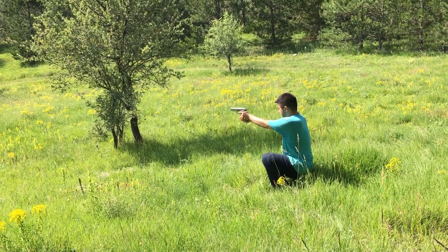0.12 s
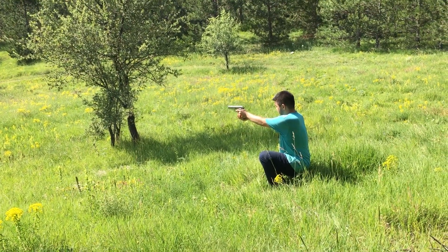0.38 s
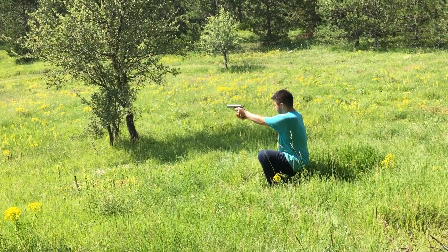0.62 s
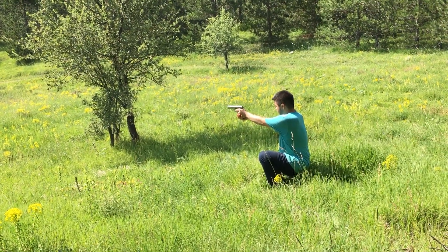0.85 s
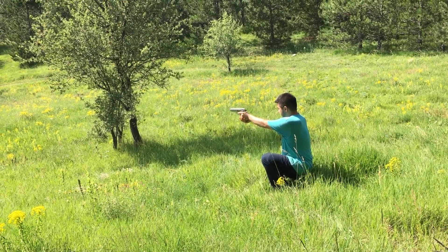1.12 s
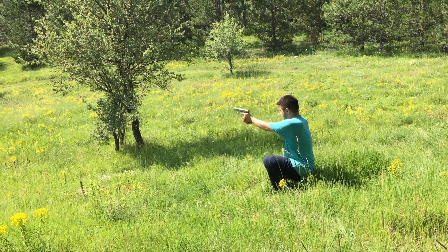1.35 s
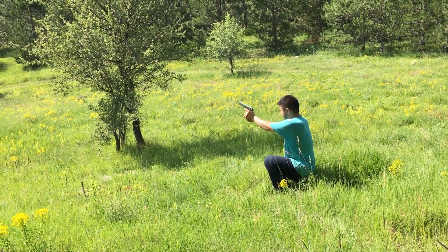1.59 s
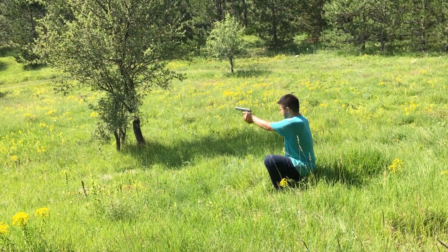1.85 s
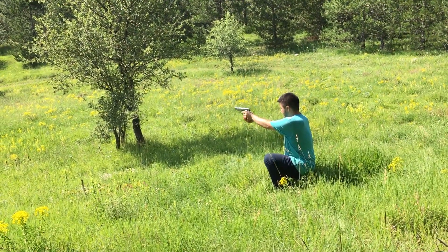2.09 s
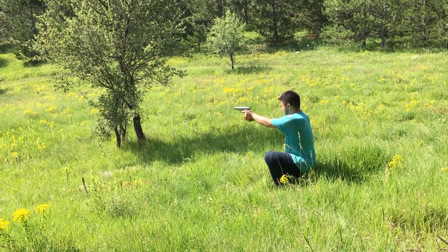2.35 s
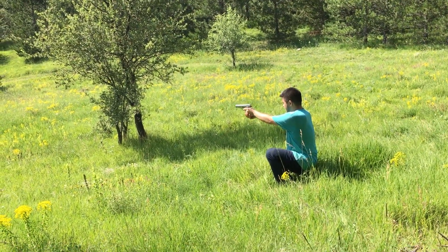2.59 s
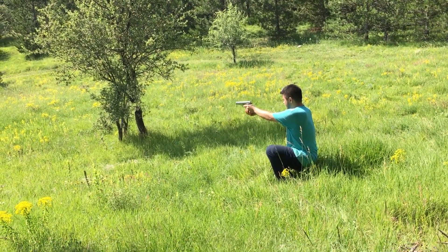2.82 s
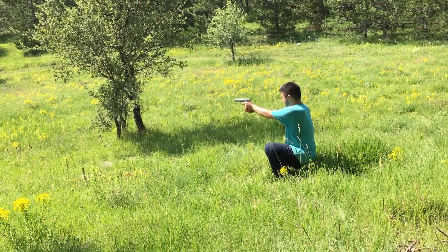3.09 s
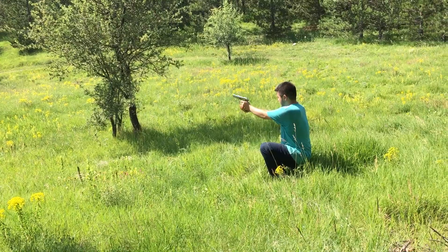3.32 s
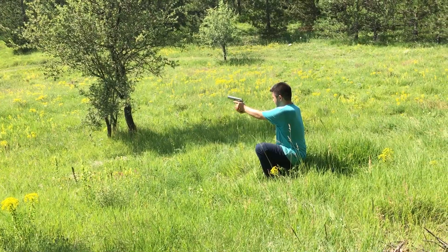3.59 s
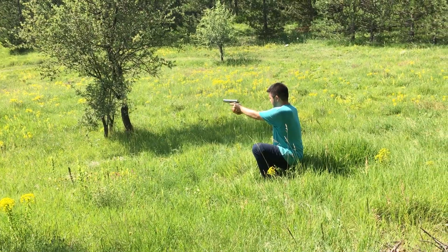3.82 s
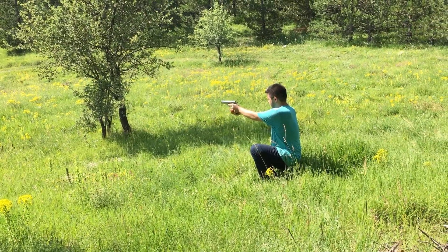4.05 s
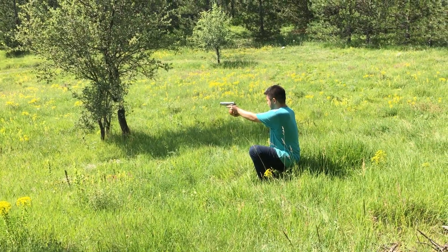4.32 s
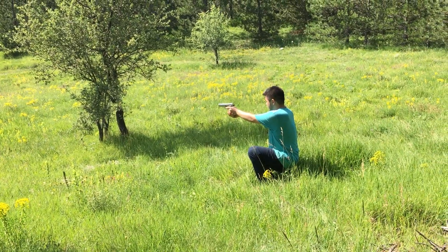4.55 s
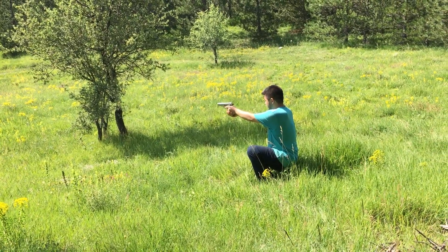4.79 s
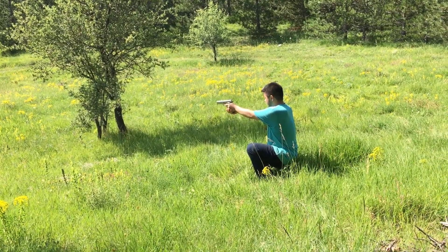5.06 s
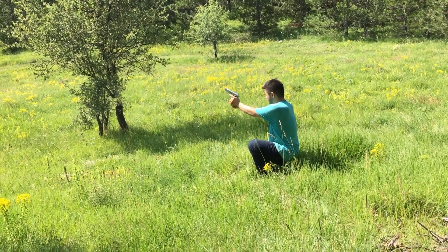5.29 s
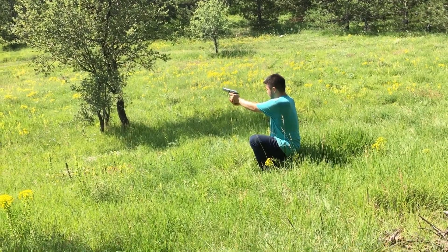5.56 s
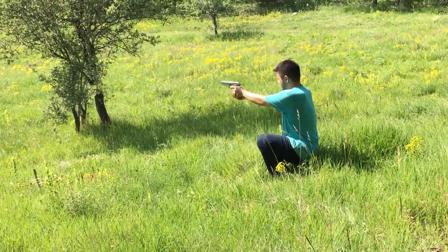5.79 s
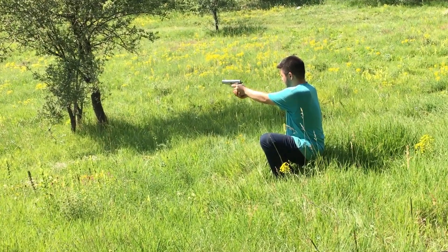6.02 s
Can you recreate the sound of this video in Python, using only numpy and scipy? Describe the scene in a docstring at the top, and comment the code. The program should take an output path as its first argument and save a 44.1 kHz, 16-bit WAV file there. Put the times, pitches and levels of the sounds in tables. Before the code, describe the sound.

Outdoors, faint ticking and soft breeze are broken by three evenly spaced pistol cracks, each rolling back from the trees as it darkens.

```python
"""Blank pistol shots in a meadow

A blank pistol is fired about every two seconds in a meadow ringed by woods, some metres from a small camera.
Each shot is a ringing pressure dip (the crack), a low thump and a roar of shaped noise off grass and near trees.
The woods answer with the same long, dulling echo each time, built from scattered pulses and fading noise.
The camera ticks faintly, a breeze of filtered noise rumbles, and a limiter ducks these sounds after every shot.
Steady hiss and a low rumble lie behind it all."""
import sys
import numpy as np
from scipy import signal
from scipy.fft import rfft, irfft
from scipy.io import wavfile
from scipy.ndimage import uniform_filter1d, minimum_filter1d

SR = 44100
rng = np.random.default_rng(int(sys.argv[2]) if len(sys.argv) > 2 else 0)


def generate_wav(signal):
    """Clip the signal to [-1, 1] and save it as 16-bit WAV at the path in sys.argv[1]."""
    frames = np.transpose(np.atleast_2d(signal))
    scaled = np.clip(frames, -1, 1) * 32767
    pcm = np.round(scaled).astype(np.int16)
    wavfile.write(sys.argv[1], SR, pcm)


def convert_level_to_amplitude(level_db):
    """Map a level in decibels to its linear amplitude factor."""
    exponent = np.asarray(level_db, float) / 20
    return 10 ** exponent


N = 271656
TIME = np.arange(N) / SR
# centres of the third-octave bands, in Hz
BANDS = 100 * 2 ** np.arange(0, 7.4, 1 / 3)

# All levels in the tables are relative.
# the shots; one before time 0 leaves only its echo: start_s, crack_db, roar_db, echo_db, ring_db
SHOTS = [(-1.055, 16, 0, 1.5, -6), (1.5520, 16, .5, .5, -6), (3.4431, 16, 1, .5, -6.5),
         (5.2469, 16, 3.5, 3, -8)]
# what the crack rings in: pitch_hz, level_db, time_to_fall_60_db_s
CRACK_TONES = [(600, -4, .022), (1150, -3, .010), (3100, -1, .009), (7000, -11, .003)]
# tones that swell up to each crack: pitch_hz, waver_width_hz, level_db, swell_time_s
SWELLING_TONES = [(230, 70, -12, .010), (490, 100, -10, .012), (610, 110, -1, .009), (1200, 120, -15, .009),
                  (3060, 60, -21, .009)]
# fading of the roar off the ground and nearest trees: time_after_shot_s, level_db
ROAR_FADE = [(0, 1), (.006, -2), (.02, -4), (.03, -4), (.036, -10), (.05, -17), (.065, -23), (.095, -31),
             (.14, -48)]
# tone colour of the roar: pitch_hz, level_per_band_db
ROAR_COLOUR = [(100, 1), (200, 0), (500, -6), (900, 1), (1500, 2), (3000, 3.5), (4700, -2), (9000, -3.5),
               (15000, -8)]
# blurred echo, first a near edge and then the deep wood: time_after_shot_s, level_db
WOODS_FADE = [(.095, -31), (.2, -33), (.25, -27), (.3, -30.5), (.36, -36), (.5, -36.5), (.76, -43.5),
              (.92, -42.5), (1.3, -49.5), (1.55, -55), (1.8, -69.5)]
# trunks and edges, near and far, that answer clearly: time_after_shot_s, level_db
CLEAR_TRUNKS = [(.076, -20), (.113, -19), (.119, -22), (.156, -25.5), (.196, -22.5), (.208, -22.5),
                (.221, -21), (.238, -19.5), (.268, -18.5), (.297, -21.5), (.369, -28), (.396, -22.5),
                (.419, -25), (.441, -26.5), (.497, -28), (.522, -27.5), (.545, -30), (.889, -35),
                (.949, -34.5)]
# colour of the echo, with extra loss in air and leaves, and how much of each answer stays sharp:
# pitch_hz, level_per_band_db, loss_db_per_s, sharp_share_0_to_1
ECHO_COLOUR = [(120, -32, 8, 1), (220, -27, 3, 1), (310, -11, 2, 1), (500, -4, -1.5, 1), (800, -4, 2, .9),
               (1300, -4.5, 9, .65), (2200, -7, 11.5, .5), (3500, -11, 18, .25), (6000, -13, 41, 0),
               (9000, -10, 76, 0), (13000, -13, 135, 0)]
# tones of one camera tick: pitch_hz, width_hz, level_db
TICK_TONES = [(6000, 1300, 0), (7800, 1500, -4), (11100, 1200, -5), (14400, 1700, -4)]
# stretch in which the camera ticks three times as fast: start_s, end_s
FAST_TICKS = (5.93, 6.12)
# small dry clicks close by: start_s, level_db, bump_level_db
CLICKS = [(.677, -55, -75), (1.006, -62, -75), (1.306, -58, -75), (2.678, -54, -75), (4.678, -54, -75),
          (5.1422, -43, -45), (5.146, -52, -48), (5.186, -58, -40), (5.1935, -40, -44), (6.0, -50, -70)]
# colour of the breeze: pitch_hz, level_db_per_hz
BREEZE_COLOUR = [(15, -37), (38, -17), (55, -1), (70, -1), (100, -6), (165, -17), (250, -12), (400, -15),
                 (700, -18), (1600, -26), (4000, -34), (6000, -35), (10400, -42), (14800, -40),
                 (16000, -46)]
# spent cases falling into the grass, and a hand shifting on the camera:
# middle_s, level_db, length_s, pitch_hz
RUSTLES = [(2.21, -68, .04, 10000), (4.12, -66, .03, 10000), (5.165, -49, .07, 200),
           (5.146, -62, .012, 4000), (5.188, -44, .015, 260), (5.19, -63, .025, 3500),
           (5.95, -68, .04, 10000)]


def read(table, x, column=1, log=False):
    """Straight lines between the rows of a table; log spaces the first column by pitch."""
    t = np.array(table, float)
    if log:
        return np.interp(np.log(x), np.log(t[:, 0]), t[:, column])
    return np.interp(x, t[:, 0], t[:, column])


def band(x, hz, width):
    """Band-pass; white noise of rms 1 stays at about rms 1."""
    low, high = max(hz - width / 2, 10), min(hz + width / 2, .49 * SR)
    sos = signal.butter(2, [low, high], "band", fs=SR, output="sos")
    return signal.sosfilt(sos, x) * np.sqrt(SR / 2 / (high - low))


def third(x, hz):
    """One of a set of third-octave bands, overlapping triangles; white noise of rms 1 gives about rms 1."""
    freq = np.fft.rfftfreq(len(x), 1 / SR) + 1e-3
    triangle = np.clip(1 - abs(3 * np.log2(freq / hz)), 0, 1)
    return irfft(rfft(x) * triangle, len(x)) * np.sqrt(SR / 2 / (.23 * hz))


def add(out, sound, s):
    """Mix a sound in from time s; whatever falls outside the scene is cut off."""
    i = int(round(s * SR))
    part = sound[max(-i, 0):N - i]
    out[max(i, 0):max(i, 0) + len(part)] += part


def crack(t):
    """Sharp pressure dip: tones whose troughs meet a quarter of a millisecond in, dying within milliseconds."""
    tones = 0
    for hz, db, t60 in CRACK_TONES:
        tones = tones + convert_level_to_amplitude(db) * np.cos(2 * np.pi * hz * (t - .00023)) * convert_level_to_amplitude(-60 * t / t60)
    return -tones


def thump(t):
    """Low push of air: a few swings of a bass tone under a quickly closing envelope."""
    pitch_hz, level_db, length_s = 61, 10, .025
    swing = -np.sin(2 * np.pi * pitch_hz * (t + .0008))
    return convert_level_to_amplitude(level_db) * swing * np.exp(-(t / length_s) ** 3) * np.clip(t / .008, 0, 1)


def roar(t):
    """Gritty noise off grass and near trees, which scatter little bass, so the bass ends early."""
    bass_hz, bass_s = 450, .065
    grit = rng.standard_normal(len(t)) * convert_level_to_amplitude(3.0 * rng.standard_normal(len(t)))
    # it arrives in uneven slaps of 60 samples
    grit *= convert_level_to_amplitude(2.5 * np.repeat(rng.standard_normal(len(t) // 60), 60))
    out = 0
    for hz in BANDS:
        octaves_below = max(np.log2(bass_hz / hz), 0)
        bass_gone = np.exp(-octaves_below * (t / bass_s) ** 1.5)
        out = out + convert_level_to_amplitude(read(ROAR_COLOUR, hz, log=True) - 8) * third(grit, hz) * bass_gone
    return convert_level_to_amplitude(read(ROAR_FADE, t)) * out


def blast(crack_db, roar_db):
    """The direct sound of a shot: crack, thump and roar together."""
    t = np.arange(SR // 5) / SR
    return convert_level_to_amplitude(crack_db) * crack(t) + convert_level_to_amplitude(roar_db) * (roar(t) + thump(t))


def lead_in(ring_db, length_s):
    """A small tick and a fizz, then wavering tones that swell until the crack."""
    t = np.arange(int(length_s * SR)) / SR
    tick = band(rng.standard_normal(len(t)) * np.exp(-t / .0012), 2200, 4000)
    fizz = band(rng.standard_normal(len(t)), 1500, 2500) * (.4 + t / length_s)
    out = convert_level_to_amplitude(-27) * tick + convert_level_to_amplitude(-37) * fizz
    for hz, width, db, swell in SWELLING_TONES:
        # slow noise, summed up, makes the phase wander
        waver = np.cumsum(uniform_filter1d(rng.standard_normal(len(t)), size=130)) * width * 10 / SR
        turns = hz * (t - length_s + .001) + waver - waver[-1]
        out += convert_level_to_amplitude(ring_db + db) * np.exp((t - length_s) / swell) * np.cos(2 * np.pi * turns)
    return out


def stand():
    """Rows (time_s, level_db) of lesser trunks: uneven gaps, levels tied to the blurred echo."""
    gap_s, first_s, last_s = .024, .13, 1.8
    over_echo_db, scatter_db = 5, 2.0
    s = np.arange(first_s, last_s, gap_s)
    chance = rng.standard_normal((len(s), 2))
    s = s + .3 * gap_s * chance[:, 0]
    db = read(WOODS_FADE, s) + over_echo_db + scatter_db * chance[:, 1]
    # leave room around the clear trunks
    nearest_s = abs(s[:, None] - np.array(CLEAR_TRUNKS)[:, 0]).min(axis=1)
    return np.c_[s, db][nearest_s > gap_s / 2]


def woods():
    """The echo of one shot: dense scatter plus clear answers, with the treble fading fastest."""
    late_bass_hz, bass_cut_db, bass_rise_s = 700, -12, .25  # cut per octave below late_bass_hz
    t = np.arange(2 * SR) / SR
    answers = np.zeros(len(t))
    trees = np.r_[CLEAR_TRUNKS, stand()]
    chance = rng.random((len(trees), 16))
    for (s, db), c in zip(trees, chance):
        # a trunk and its neighbours answer within a few ms, pushing or pulling
        places = ((s - .001 + .007 * c[:8]) * SR).astype(int)
        answers[places] += 5.0 * convert_level_to_amplitude(db) * np.sign(c[8:] - .5)
    blurred_power = uniform_filter1d(uniform_filter1d(answers ** 2, size=600), size=600)
    fade_in, fade_out = np.clip((t - .06) / .04, 0, 1), np.clip((2 - t) * 8, 0, 1)
    dense_power = convert_level_to_amplitude(read(WOODS_FADE, t)) ** 2 * fade_in * fade_out
    leaves, out = rng.standard_normal(len(t)), 0
    for hz in BANDS[1:]:
        db, loss_db, sharp = (read(ECHO_COLOUR, hz, column=c, log=True) for c in range(1, 4))
        sharp = np.clip(sharp, 0, 1)
        # leaves smear the treble of each answer
        smear = leaves * np.sqrt(dense_power + (1 - sharp ** 2) * abs(blurred_power))
        # early echoes are thin in bass, which rises later
        late_db = bass_cut_db * max(np.log2(late_bass_hz / hz), 0) * np.exp(-t / bass_rise_s)
        out = out + third((sharp * answers + smear) * convert_level_to_amplitude(db - loss_db * t + late_db), hz)
    return out


def camera():
    """Nearly even ticks of the works inside and clicks of the hand: pulses sent through band-passes."""
    first_s, period_s, tick_db = .0106, .05, -56.5
    pulses, bumps = np.zeros(N), np.zeros(N)
    beat = np.arange(first_s, N / SR - .01, period_s / 3)
    every_third = np.arange(len(beat)) % 3 == 0
    fast = (beat > FAST_TICKS[0]) & (beat < FAST_TICKS[1])
    beat = beat[every_third | fast]
    chance = rng.standard_normal((len(beat), 2))
    places = ((beat + .0003 * chance[:, 0]) * SR).astype(int)
    pulses[places] = convert_level_to_amplitude(tick_db + .8 * chance[:, 1])
    for s, db, bump_db in CLICKS:
        pulses[int(s * SR)] += convert_level_to_amplitude(db)
        bumps[int(s * SR)] += convert_level_to_amplitude(bump_db)
    ticking = sum(convert_level_to_amplitude(db) * band(pulses, hz, width) for hz, width, db in TICK_TONES)
    return 2.1 * ticking + 6.5 * band(bumps, 300, 500)


def rustles():
    """Brief swishes: bands of noise that swell and fade in a bell shape."""
    out = 0
    for s, db, length, hz in RUSTLES:
        bell = np.exp(-((TIME - s) / length) ** 2 * 4)
        out = out + convert_level_to_amplitude(db) * bell * band(rng.standard_normal(N), hz, hz)
    return out


def meadow():
    """Breeze and far hush: coloured noise whose bass comes and goes with random gusts, plus rustles."""
    hz = np.fft.rfftfreq(N, 1 / SR) + 1
    air = irfft(rfft(rng.standard_normal(N)) * convert_level_to_amplitude(read(BREEZE_COLOUR, hz, log=True)), N)
    gust = np.repeat(rng.standard_normal(N // 4000 + 1), 4000)[:N]
    gust = uniform_filter1d(gust, size=4000)
    low = signal.sosfilt(signal.butter(2, 200, fs=SR, output="sos"), air)
    air = air + low * (convert_level_to_amplitude(2.5 * gust) - 1)
    return air * convert_level_to_amplitude(-68) / air.std() + rustles()


def scene():
    """Every shot wakes the same woods, over the meadow and the camera."""
    lead_s = .0232
    out, echo = meadow() + camera(), woods()
    for s, crack_db, roar_db, echo_db, ring_db in SHOTS:
        add(out, convert_level_to_amplitude(echo_db) * echo, s)
        if s > 0:
            add(out, lead_in(ring_db, lead_s), s - lead_s)
            add(out, blast(crack_db, roar_db), s)
    return out[None]


def top_cut(x):
    """Nothing passes above the cut-off."""
    return signal.sosfilt(signal.butter(12, 16490, fs=SR, output="sos"), x)


def record(dry):
    """A limiter drops at once on a peak and recovers slowly; hiss and a low rumble come behind it."""
    ceiling_db, release_s, start_cut_db = -3.5, .5, 2.5
    over_db = np.maximum(20 * np.log10(abs(dry[0]) + 1e-9) - ceiling_db, 1e-3)
    over_db = -minimum_filter1d(-over_db, size=15)  # highest value within 15 samples
    over_db[0] = start_cut_db  # still recovering from the shot before
    # the cut decays exponentially unless a new peak asks for more
    cut_db = np.exp(np.maximum.accumulate(np.log(over_db) + TIME / release_s) - TIME / release_s)
    hiss = convert_level_to_amplitude(-82) * rng.standard_normal(N)
    rumble = convert_level_to_amplitude(-75) * band(rng.standard_normal(N), 55, 14)
    mix = dry * convert_level_to_amplitude(-cut_db) + hiss + rumble
    # steep low-pass: 15600 Hz edge, .3 dB ripple, 40 dB down beyond
    mix = signal.sosfilt(signal.ellip(6, .3, 40, 15600, fs=SR, output="sos"), mix)
    return top_cut(mix)


dry = scene()
out = record(dry)
generate_wav(out)
```